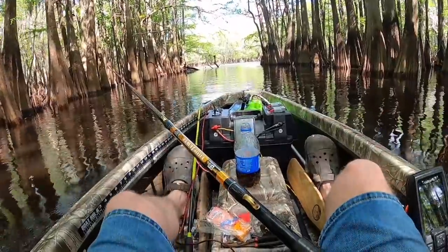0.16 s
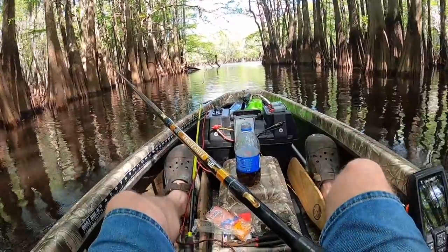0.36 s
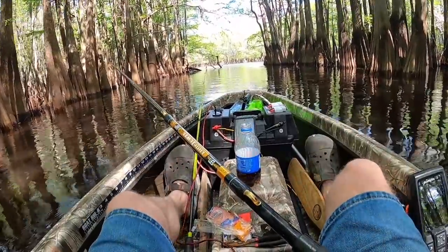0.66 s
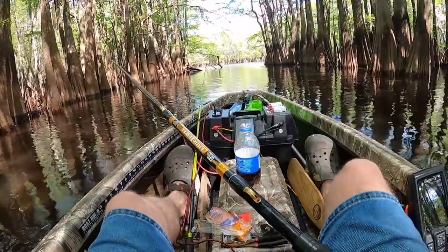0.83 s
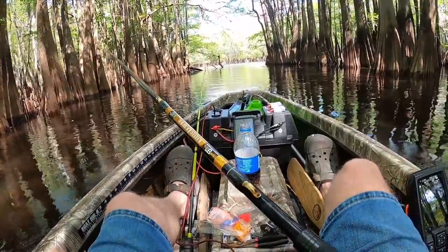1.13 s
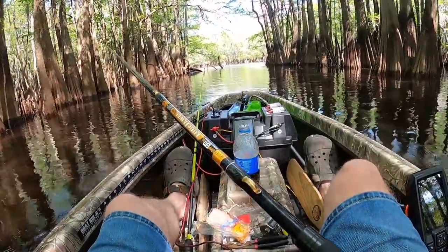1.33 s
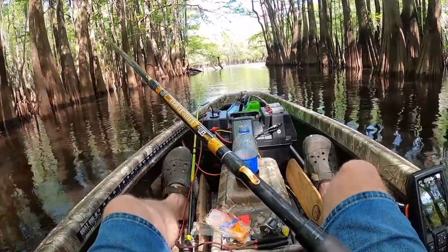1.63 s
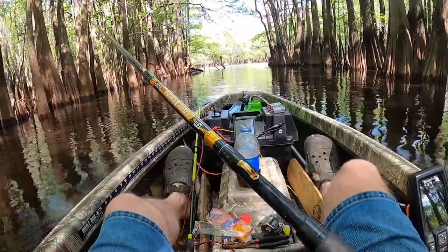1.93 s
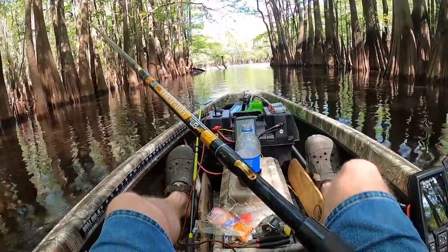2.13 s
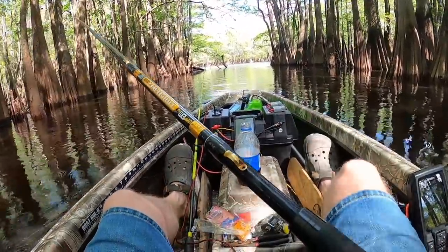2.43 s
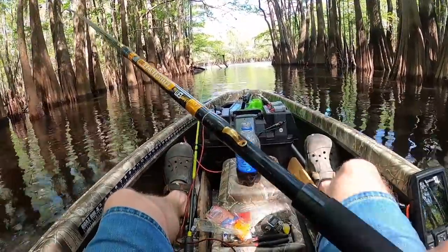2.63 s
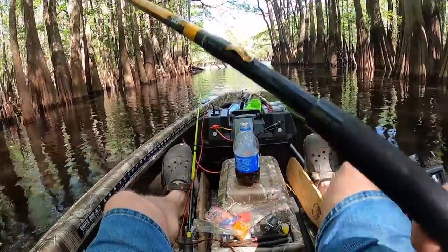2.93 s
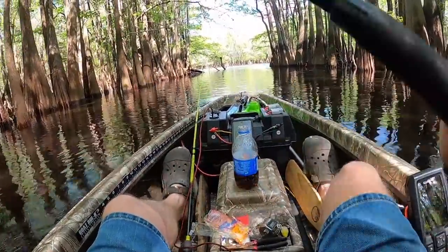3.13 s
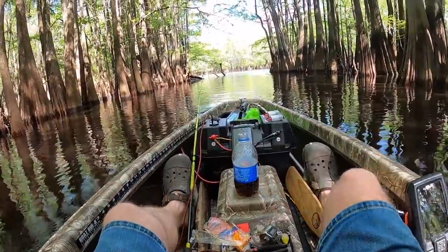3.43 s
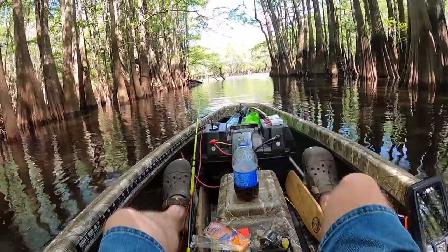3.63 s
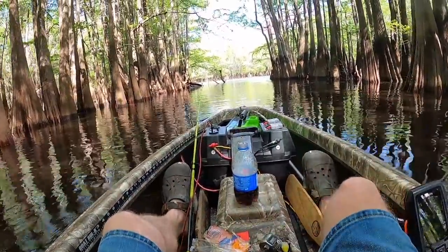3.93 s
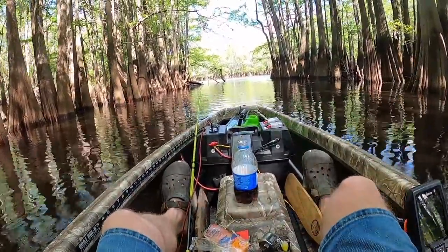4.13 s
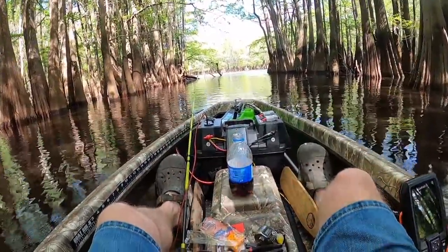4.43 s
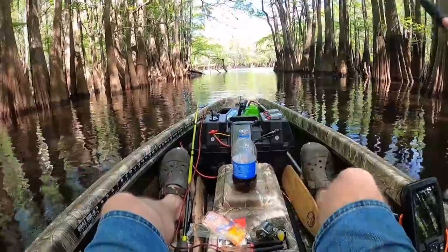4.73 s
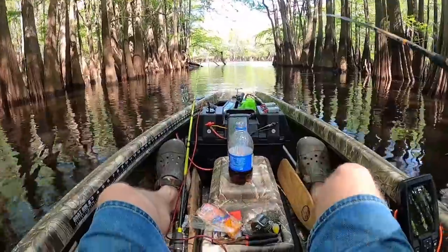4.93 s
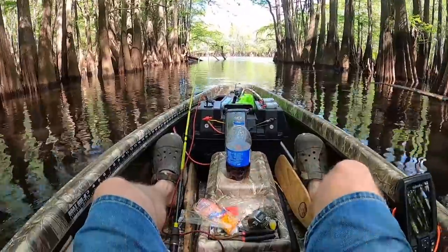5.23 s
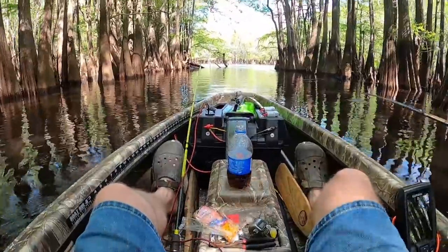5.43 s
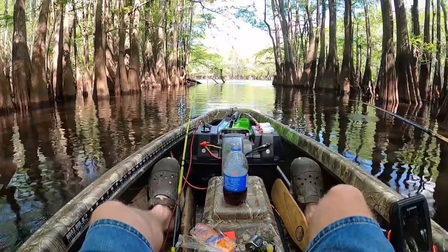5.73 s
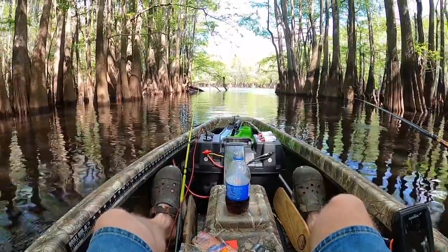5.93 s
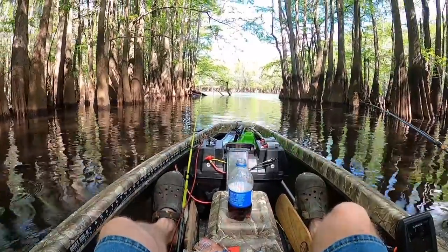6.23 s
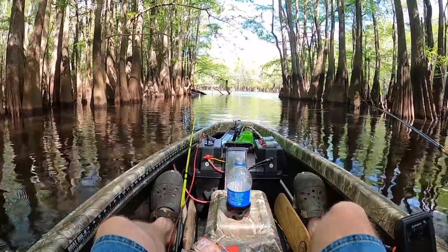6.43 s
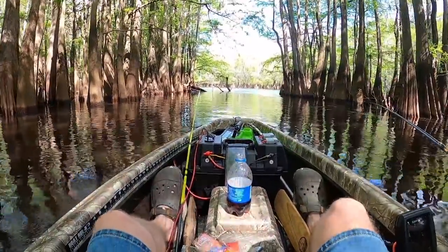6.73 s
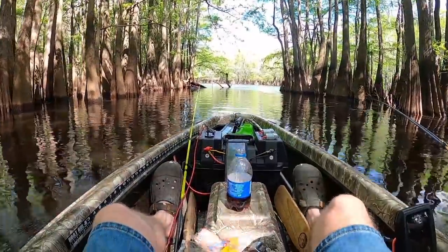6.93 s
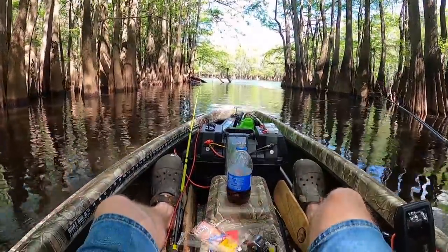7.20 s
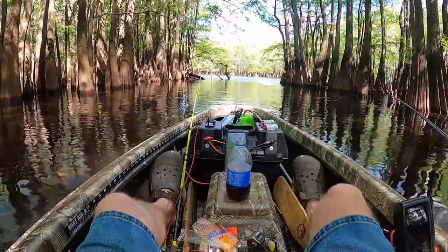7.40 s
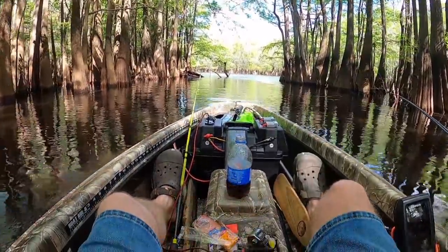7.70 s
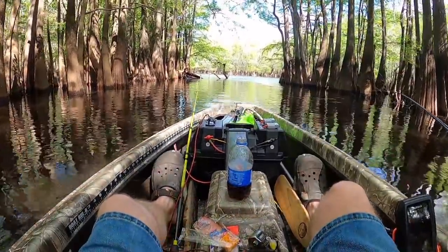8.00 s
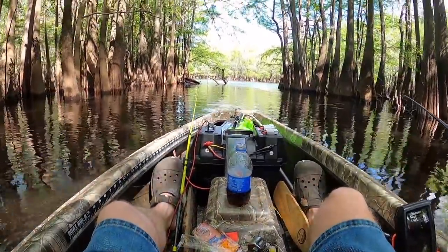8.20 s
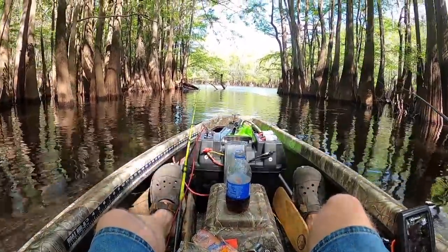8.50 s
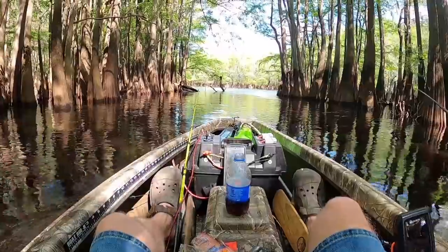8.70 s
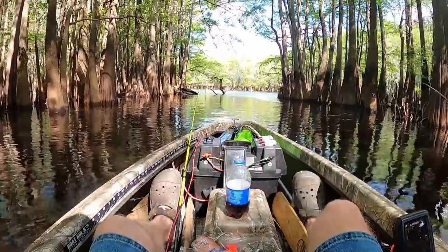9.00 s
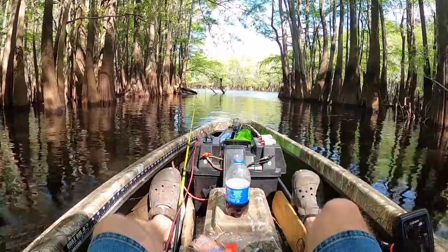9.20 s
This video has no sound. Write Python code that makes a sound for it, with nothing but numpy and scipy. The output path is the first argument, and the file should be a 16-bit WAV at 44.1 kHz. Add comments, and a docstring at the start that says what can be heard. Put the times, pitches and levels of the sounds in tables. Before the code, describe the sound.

A small boat glides through a flooded forest, its electric motor humming low as the hull rumbles and water washes softly beneath. Close to the microphone, a fishing rod rustles, squeaks and knocks on the boat, with a louder clatter late on. A near bird chips in twos and threes throughout. Farther off come whistles, a see-saw song midway and then a rising trill, echoing over faint insects.

```python
"""A flooded forest: a small boat glides along, its electric motor humming through the hull.
The boat rocks and water washes and plops under it, over still air and faint insects.
A fishing rod is handled: it rustles, squeaks and knocks on the boat, making the hull ring.
A near bird gives sharp chips in twos and threes. Further off come whistles, thin high calls,
a see-saw song and a rising trill, all gliding tones that echo among the trunks."""
import sys
import numpy as np
from scipy import signal
from scipy.fft import rfft, irfft, next_fast_len
from scipy.io import wavfile
from scipy.ndimage import uniform_filter1d

SR = 44100
rng = np.random.default_rng(int(sys.argv[2]) if len(sys.argv) > 2 else 0)


def to_wav(s):
    """Save 16-bit WAV."""
    ch = np.atleast_2d(s).T  # columns
    pcm = np.round(np.clip(ch, -1, 1) * 32767)  # PCM
    wavfile.write(sys.argv[1], SR, pcm.astype(np.int16))


N = 412335
T = np.arange(N) / SR

# Levels in all tables are relative: each sound gets its final loudness when it is mixed.
# flow of water along the hull: time_s, level_db
FLOW = [(0.0, -54), (0.88, -56), (2.54, -46.5), (4.25, -47), (4.53, -50), (4.97, -45.5), (5.41, -48),
        (5.85, -47), (6.22, -46.5), (6.52, -52), (7.15, -49.5), (7.43, -55), (7.87, -53), (8.6, -53),
        (8.81, -48), (9.3, -43.5)]


def undb(db):
    """Turn decibels into a number to multiply by."""
    return 10 ** (np.asarray(db) / 20)


def unit(x):
    """Scale a sound to an average strength (rms) of 1."""
    return x / np.sqrt(np.mean(x ** 2) + 1e-20)


def curves(table, t=T):
    """Join the values in each column by straight lines in time."""
    times, *columns = np.transpose(table)
    return [np.interp(t, times, column) for column in columns]


def add(track, start_s, x):
    """Mix a sound into a track."""
    i = max(int(start_s * SR), 0)
    track[i:i + len(x)] += x[:max(N - i, 0)]


def colour(x, spectrum):
    """Shape a sound by (pitch_hz, level_db) points, silent outside them; strength 1."""
    hz, db = np.transpose(spectrum)
    size = next_fast_len(N)
    f = np.maximum(np.fft.rfftfreq(size, 1 / SR), 1)
    gain = undb(np.interp(np.log(f), np.log(hz), db, left=-np.inf, right=-np.inf))
    return unit(irfft(rfft(x, size) * gain, size)[..., :N])


def soften(x, hz):
    """Dull a sound above a given pitch."""
    return signal.sosfilt(signal.butter(2, hz, fs=SR, output="sos"), x)


def drift(rate):
    """Smooth random wandering of size about 1, with rate new values a second."""
    points = rng.standard_normal(2000)
    path = np.interp(T * rate, np.arange(len(points)), points)
    return unit(uniform_filter1d(path, int(SR / rate / 2) + 1))


def swell(t, length, attack, release):
    """A loudness shape that rises, holds and falls back to silence."""
    return np.sin(np.pi / 2 * np.clip(np.minimum(t / attack, (length - t) / release), 0, 1))


def phase_of(hz):
    """The angle a wave has turned through as it follows a pitch curve."""
    return 2 * np.pi * np.cumsum(hz) / SR


def slurs(notes, waver):
    """Pure notes that bend through three pitches and waver in pitch and strength."""
    out = np.zeros(N)
    bend, flutter = 1 + waver * drift(90), undb(2 * drift(60))
    for s, length, start, middle, end, db in notes:
        progress = np.linspace(0, 1, int(length * SR))
        i = max(int(s * SR), 0)
        arch = np.polyfit([0, .5, 1], [start, middle, end], 2)
        hz = np.polyval(arch, progress) * bend[i:i + len(progress)]
        add(out, s, undb(db) * signal.windows.tukey(len(hz), .55) * np.sin(phase_of(hz)))
    return out * flutter


def glides(notes, length_s, rise):
    """List notes of one length that all glide by the same share of their pitch."""
    return [(s, length_s, hz * (1 - rise), hz, hz * (1 + rise), db) for s, hz, db in notes]


def pan(x, left_db):
    """Make a sound left_db louder on the left than on the right."""
    return x * undb(np.array([[left_db], [-left_db]]) / 2)


def delay_left(x, lag):
    """Let a sound reach the left microphone lag samples later."""
    left, right = np.broadcast_to(x, (2, N))
    size = next_fast_len(N)
    delay = np.exp(-2j * np.pi * np.fft.rfftfreq(size) * lag)
    return np.array([irfft(rfft(left, size) * delay, size)[:N], right])


def wide_noise(side_db, size=N):
    """Stereo noise; a higher side_db makes it wider."""
    mid, side = rng.standard_normal((2, size))
    return mid + undb(side_db) * side * np.array([[1], [-1]])


def forest(x, fade_s, build_s, side_db):
    """The echo of countless trunks builds up, then dies away by 60 dB every fade_s."""
    t = T[:SR]
    tail = wide_noise(side_db, size=SR) * (1 - np.exp(-t / build_s)) * undb(-60 * t / fade_s)
    return signal.fftconvolve(x[None], unit(tail) / np.sqrt(SR), axes=1)[:, :N]


def scatter(x):
    """Leaves and twigs on the way smear each note by a few milliseconds."""
    return forest(x, fade_s=.04, build_s=.001, side_db=-5)


def air_and_insects():
    """Still forest air is a soft, low noise; the insect chorus is a faint, high one."""
    # tone of the air: pitch_hz, level_db
    air_tone = [(150, 6), (400, 10), (700, -4), (1200, -4), (2000, -28), (2600, -22), (3500, -32),
                (6000, -41), (8500, -36), (11000, -55), (15500, -32)]
    # tone of the insects: pitch_hz, level_db
    insect_tone = [(3000, -36), (4600, 16), (5300, 2), (6400, 6), (7700, -35), (10000, -19)]
    air = colour(wide_noise(side_db=-8), air_tone) * undb(-63 + .09 * drift(.48))
    insects = colour(wide_noise(side_db=1.5), insect_tone) * undb(-85.5 + .73 * drift(34))
    return air + insects


def motor():
    """The motor shakes the hull at multiples of its shaft's turning speed."""
    # shaft speed: time_s, turns_per_s
    shaft = [(0, 18.3), (1.2, 18.2), (2.2, 17.9), (3.2, 18.3), (5.9, 18.2), (7.2, 18.0), (8.3, 18.2),
             (9.35, 19.0)]
    # low hums at 3 and 4 times the shaft speed: time_s, third_db, fourth_db
    hum = [(0.33, -51.5, -44.5), (1.72, -54, -56), (3.41, -42, -44), (3.51, -49.5, -43.5),
           (5.25, -53.5, -49.5), (5.32, -39, -51), (5.5, -56.5, -46.5), (5.94, -38.5, -48),
           (6.59, -67, -68), (6.81, -47, -51), (6.91, -57, -75), (6.96, -50, -49), (7.28, -58, -65),
           (7.56, -50, -59), (7.66, -46.5, -49), (8.7, -56.5, -52.5), (9.25, -44, -43)]
    # propeller tones, which grow with the flow: shaft_multiple, level_db
    propeller = [(6, -3), (8, -8), (11, -17), (13, -11.5)]
    angle = phase_of(curves(shaft)[0] * (1 + .0084 * drift(7.6)))
    third_db, fourth_db = curves(hum)
    flow_db = curves(FLOW)[0]
    skew = .39 * drift(9) * np.array([[1], [-1]])  # swaying puts left and right out of step

    def shake(multiple, db):
        """One tone of the motor, wavering in strength."""
        return undb(db + 2.23 * drift(7)) * np.sin(multiple * angle + skew + rng.uniform(0, 2 * np.pi))

    low = shake(3, third_db + 4) + shake(4, fourth_db + 5)
    high = sum(shake(multiple, flow_db + db) for multiple, db in propeller)
    return pan(low + high, left_db=.5)


def rocking_boat():
    """With each sway the hull rumbles and air buffets the microphones."""
    # sways of the boat: peak_s, length_s, level_db
    sways = [(0, 0.62, -57), (0.213, 0.59, -39.5), (0.646, 0.52, -48.5), (1.115, 0.79, -49.5),
             (2.89, 0.92, -45), (3.363, 0.3, -45.5), (5.266, 0.49, -47.5), (5.99, 0.22, -40.5),
             (6.355, 0.64, -50), (6.9, 0.48, -51), (7.487, 0.73, -52), (7.774, 0.39, -38.5),
             (8.307, 0.23, -57), (8.87, 0.24, -69)]
    # tone of the hull's rumble: pitch_hz, level_db
    rumble_tone = [(8, -24), (30, 8), (50, 9.5), (70, -2), (110, -8), (220, -31)]
    # tone of the buffeting air: pitch_hz, level_db
    buffet_tone = [(10, -17), (24, 1), (36, -15), (60, -18.5)]
    rocking = undb(-59.5)  # a little remains between sways
    for s, length, db in sways:
        half = length / 2
        rocking = rocking + undb(db) * swell(T - s + half, length, half, half) ** 2
    rumble = colour(wide_noise(side_db=-7.5), rumble_tone) * rocking * undb(3.5)
    buffet = colour(wide_noise(side_db=6), buffet_tone) * rocking * undb(-10.5)
    return pan(rumble, left_db=4) + buffet


def water():
    """Water washes along the hull as low noise and plops under it in short rising notes."""
    # tone of the wash: pitch_hz, level_db
    wash_tone = [(30, -39.5), (60, 2.5), (100, 11.5), (150, 2.5), (200, 0.5), (240, -2.5), (290, -9),
                 (450, -20.5), (700, -29.5), (1500, -87)]
    # plops under the hull: start_s, pitch_hz, level_db
    plop_notes = [(.725, 320, -62), (1.16, 318, -51), (1.225, 299, -48.5), (1.335, 290, -55),
                  (1.402, 358, -57), (1.825, 322, -55.5)]
    wash = colour(wide_noise(side_db=-24.5), wash_tone) * undb(curves(FLOW)[0] + 1 + 1.88 * drift(16))
    plops = slurs(glides(plop_notes, length_s=.038, rise=.088), waver=.035)
    return pan(wash + plops, left_db=1.5)


def friction(rough_db, catch_db, side_db):
    """Noise of uneven strokes, with tiny ticks where the surfaces catch."""
    caught = rng.random(N) < 400 / SR  # about 400 ticks a second
    ticks = caught * rng.standard_normal(N) * undb(2 * rng.exponential(size=N))
    return (wide_noise(side_db) + undb(catch_db) * unit(ticks)) * undb(rough_db * drift(45))


def rod_handling():
    """Hands rub the rod, it slides and swishes over cloth, the line hisses and the gear squeaks."""
    # moves of the hands and rod: start_s, length_s, rub_db, swish_db, hiss_db
    moves = [(-.05, 0.42, -66, -74, -82), (0.78, 0.52, -66, -82, -94), (1.147, 0.36, -63, -79, -91),
             (1.442, 0.35, -64, -74.5, -81), (1.677, 0.44, -66.5, -79, -93),
             (2.26, 0.37, -65.5, -70.5, -82.5), (2.576, 0.53, -64, -70, -83.5), (3.375, 0.3, -67, -85, -93),
             (4.275, 0.21, -69, -74, -98), (4.658, 0.33, -70, -70.5, -83), (4.904, 0.45, -77, -75, -80.5),
             (5.437, 0.43, -64, -79.5, -90), (5.745, 0.28, -61.5, -85, -81), (5.962, 0.61, -62, -93, -87),
             (6.63, 0.62, -59, -77, -81.5), (8.417, 0.46, -60.5, -85, -89),
             (8.936, 0.25, -66.5, -76, -83.5), (9.194, 0.39, -70, -75, -78)]
    # tones of the rubbing hands, rod tube, cloth and line: pitch_hz, level_db
    rub_tone = [(300, 13), (600, 5), (1000, 2.5), (1280, 7), (1500, 4.5), (1750, 3), (2200, 0.5),
                (2800, -8.5), (4300, -17), (6500, -39), (10000, -43)]
    tube_tone = [(900, -30), (1270, 10.5), (1500, -6), (1750, 4.5), (2150, 4.5), (2800, -16), (3500, -6),
                 (4100, -4), (4700, -3), (6000, -28)]
    swish_tone = [(1700, -25.5), (2400, 6), (2900, 1.5), (3500, -0.5), (4500, -1), (7000, -8.5)]
    hiss_tone = [(2000, -28.5), (4500, 2), (6500, 6.5), (9000, 8), (11000, -5), (13000, -2), (15500, -29)]
    # squeaks of shifting gear: start_s, length_s, start_hz, middle_hz, end_hz, level_db
    squeaks = [(0, 0.041, 423, 401, 380, -50), (.168, 0.019, 1100, 1160, 1190, -54),
               (.172, 0.065, 1450, 1500, 1650, -62), (.21, 0.016, 1660, 1810, 1920, -50),
               (.23, 0.032, 1280, 1480, 1780, -55.5), (.248, 0.019, 1860, 2076, 2020, -48.5),
               (.36, 0.027, 1830, 1790, 1800, -63), (1.6, .045, 3900, 3750, 3570, -64),
               (1.722, 0.083, 4200, 4080, 3960, -61), (1.83, .07, 4500, 4320, 4180, -76),
               (7.078, 0.033, 1130, 1170, 1240, -59), (8.46, 0.064, 1327, 1350, 1170, -59)]
    moving = sum(np.outer(undb(levels), swell(T - s, length, attack=.12, release=.18))
                 for s, length, *levels in moves)
    holding = undb([[-71.5], [-81], [-89]])  # rub, swish and hiss while the rod is just held
    rubbing, swishing, hissing = np.hypot(moving, holding) * undb(drift(30))
    # the rod slides once and its tube rings
    sliding = undb(-59.5) * swell(T - 1.593, length=.39, attack=.23, release=.088)
    grip = friction(rough_db=2.6, catch_db=-8, side_db=-5)
    cloth = friction(rough_db=1.7, catch_db=-12, side_db=-10)
    rub = colour(grip, rub_tone) * rubbing + colour(grip, tube_tone) * sliding
    swish = colour(cloth, swish_tone) * swishing * undb(3.5)
    hiss = colour(cloth, hiss_tone) * hissing * undb(5.5)
    squeak = slurs(squeaks, waver=.0296)
    squeak = squeak + undb(-4.5) * forest(squeak, fade_s=.11, build_s=.0056, side_db=-22)
    rustle = delay_left(rub + swish + undb(-1.5) * squeak, lag=1.2)
    return pan(rustle, left_db=4.5) + pan(hiss, left_db=-.1)


def ring(tones, push, detune):
    """A push rings an object's own fading tones; each blow lands on another spot. Peak 1."""
    t = T[:len(push)]
    body = np.zeros(len(t))
    for hz, db, fade_s in tones:
        loud, sharp, flip = rng.standard_normal(3)
        wave = np.sin(2 * np.pi * hz * (1 + detune * sharp) * t)
        body += np.sign(flip) * undb(db + .23 * loud - 60 * t / fade_s) * wave
    ringing = signal.fftconvolve(push, body)[:len(t)]
    return ringing / np.abs(ringing).max()


def favour(tones, near_hz, slope_db):
    """The struck spot favours tones near one pitch; others lose slope_db an octave."""
    return [(hz, db - slope_db * abs(np.log2(hz / near_hz)), fade_s) for hz, db, fade_s in tones]


def knocks():
    """Each gritty blow clacks and rings the rod and hull, while its weight thuds in the floor."""
    # rod and gear hitting the boat:
    # start_s, ring_db, ring_hz, crack_db, dull_above_hz, thud_db, thud_hz, contact_s
    blows = [(0.101, -68, 600, -85, 4000, -27, 73, 0.0027),
             (.161, -35, 955, -71, 4000, -28.5, 189, 0.00083),
             (0.237, -47, 1500, -59.5, 5000, -23, 70.4, 0.0018),
             (0.288, -64, 750, -83, 4000, -34, 70, 0.0049), (0.34, -47, 1090, -52, 11900, -43, 151, 0.0036),
             (.584, -60, 1500, -65, 9000, -65, 151, .0012),
             (1.102, -29, 2220, -37, 11900, -52, 191, 0.0019),
             (1.1035, -31.5, 2380, -36, 11500, -47, 94, 0.0016),
             (1.11, -44, 2400, -43, 11000, -43, 150, 0.0046),
             (1.378, -40, 1210, -50, 14200, -40, 293, 0.0059),
             (1.409, -47, 1290, -69, 4000, -57, 295, 0.0036),
             (1.443, -54, 1526, -55, 7000, -62, 190, 0.00057),
             (1.585, -41, 1280, -53, 9000, -47, 150, .0034), (1.644, -61, 2000, -57, 6000, -53, 190, .001),
             (1.921, -43.5, 1140, -65, 5000, -46, 190, 0.014),
             (2.112, -55, 2400, -63, 8000, -66, 190, 0.0013),
             (2.295, -33, 1270, -56, 3800, -40, 94, 0.0016),
             (2.337, -43, 1400, -55, 4500, -54, 150, 0.0081),
             (2.406, -40, 1920, -47, 5500, -41, 94, 0.0014), (2.805, -63, 1500, -80, 5000, -41, 151, .0015),
             (2.923, -38.5, 1410, -69, 5000, -34.5, 151, 0.0076),
             (2.992, -49, 1700, -52, 6000, -29, 70, 0.0032), (3.83, -43, 1120, -57, 7000, -70, 190, 0.0014),
             (4.867, -48, 800, -79, 5000, -60, 190, 0.014), (5.151, -39, 1120, -56, 6000, -58, 190, 0.0059),
             (5.198, -55, 1230, -50, 9000, -55, 149, 0.00089),
             (5.376, -71, 1500, -60, 11000, -62, 190, 0.0008),
             (5.601, -44, 860, -74, 5000, -32, 151, 0.0078),
             (5.898, -51, 1300, -47, 9000, -52, 150, 0.0018),
             (6.337, -47.5, 1820, -61, 6000, -53, 190, 0.024),
             (6.842, -65, 1800, -53, 8000, -59, 190, 0.0015), (7, -40.5, 1750, -74, 3000, -65, 190, 0.0014),
             (7.041, -31, 1810, -43, 3000, -50, 290, 0.0028),
             (7.046, -30, 1520, -38.5, 6400, -34.5, 357, 0.0063),
             (7.055, -42, 604, -45.5, 5000, -40, 277, .004),
             (7.066, -33.5, 540, -49, 4000, -41, 284, 0.0062),
             (7.071, -35, 487, -53, 4000, -29, 227, 0.0026),
             (7.095, -49, 500, -77, 3000, -32.5, 188, .0046),
             (7.118, -55, 550, -76, 3000, -35, 188, 0.0028),
             (8.502, -42.5, 1240, -88, 4000, -57, 190, 0.0013),
             (8.722, -32.5, 970, -72, 3000, -41.5, 187, 0.0024),
             (8.821, -76, 500, -85, 4000, -28.5, 152, 0.0016),
             (9.218, -49, 1110, -52, 7040, -41, 149, 0.0032)]
    # ringing tones of the hull, the floor and the hard rod and reel: pitch_hz, level_db, fade_s
    hull_tones = [(455, -7, 0.16), (522, 9, 0.012), (720, -1, 0.031), (830, -7.5, 0.025), (986, 3, 0.027),
                  (1080, -0.5, 0.025), (1244, -1, 0.026), (1500, -26, 0.008), (1687, 7.5, 0.012),
                  (1980, -2, 0.028), (2410, 4.5, 0.017), (2520, -16.5, 0.056), (2910, 8.5, 0.005)]
    floor_tones = [(71.5, 6, 0.044), (97, 6, 0.082), (145.5, -3.5, 0.17), (185.7, -0.5, 0.095),
                   (235.5, -8, 0.083), (286, -8, 0.11), (353, -2.5, 0.085)]
    rod_tones = [(1580, -3, .025), (2150, 1, .015), (3020, 0, .018), (3280, -2, .012), (4450, -1, .016),
                 (5100, -6, .01), (6340, 2, .018), (7000, -6, .012), (7830, -2, .016), (8890, -9, .012),
                 (10600, -12, .01), (12500, -19, .01)]
    body, cracks, t = np.zeros(N), np.zeros(N), T[:SR // 4]
    for s, ring_db, ring_hz, crack_db, dull_above_hz, thud_db, thud_hz, contact_s in blows:
        force = np.exp(-t / contact_s) * (1 - np.exp(-t / .001))
        grit = rng.standard_normal(len(t)) * force
        edge = soften(grit, dull_above_hz)
        clack = np.diff(soften(edge, hz=4670), prepend=0)
        shove = np.diff(soften(force, hz=269), prepend=0)  # the heavy floor follows only slow pushes
        thud = ring(favour(floor_tones, thud_hz, slope_db=12), shove, detune=.026)
        hull = ring(favour(hull_tones, ring_hz, slope_db=8.5), soften(grit, hz=3800), detune=.039)
        rod = ring(rod_tones, edge, detune=.02)
        add(body, s, undb(ring_db) * hull + undb(thud_db - 1) * thud)
        add(cracks, s, undb(crack_db) * (undb(2.5) * rod + undb(5.5) * clack / np.abs(clack).max()))
    dulled = soften(body + undb(1.5) * cracks, hz=4700)
    echo = undb(-9) * forest(dulled, fade_s=.13, build_s=.0022, side_db=-7)
    direct = pan(delay_left(body, lag=4.1), left_db=2) + pan(delay_left(cracks, lag=.35), left_db=3.5)
    return direct + echo


def near_bird():
    """Each chip snaps down in pitch, then sags while its overtones grow."""
    # chips: start_s, level_db
    chips = [(0.345, -41.5), (.391, -39.5), (1.492, -41.5), (1.537, -40), (1.589, -40), (2.93, -42),
             (2.976, -39.5), (3.788, -39), (3.837, -38), (4.805, -38.5), (4.849, -37.5), (5.816, -39.5),
             (5.862, -42), (6.744, -40), (6.792, -40.5), (7.736, -42), (7.782, -41.5), (7.835, -42.5),
             (8.977, -40.5), (9.025, -40)]
    # echoes off the water and close trunks: delay_s, level_db
    echoes = [(.0041, -4.5), (0.01, -8.5)]
    length_s, top_hz, main_hz, snap_s, sag_hz_per_s = .022, 6500, 5320, .0016, 28000
    out, t = np.zeros(N), T[:int(length_s * SR)]
    shape = swell(t, length_s, attack=.0044, release=.0055)
    growth = undb(9.6 * (t / length_s - 1))
    for s, db in chips:
        sharp, steep = rng.standard_normal(2)
        hz = main_hz + (top_hz - main_hz) * np.exp(-t / snap_s) - sag_hz_per_s * (1 + .06 * steep) * t
        phase = phase_of(hz * (1 + .0053 * sharp))
        overtones = undb(-20.5) * np.sin(2 * phase) + undb(-31) * np.sin(3 * phase)
        chip = undb(db - 4) * shape * (np.sin(phase) + growth * overtones)
        add(out, s, chip)
        for delay_s, echo_db in echoes:
            add(out, s + delay_s * (1 + .077 * rng.standard_normal()), undb(echo_db) * chip)
    echo = undb(-11) * forest(out, fade_s=.13, build_s=.00089, side_db=2)
    return pan(delay_left(out, lag=1.3), left_db=-2) + echo


def whistling_bird():
    """Whistles creep up in pitch, then droop and lose their strength."""
    # whistles: start_s, length_s, pitch_hz, level_db
    notes = [(0.416, 0.056, 2775, -55.5), (0.631, .13, 2765, -56.5), (0.896, 0.11, 2757, -56),
             (4.063, 0.05, 2710, -62), (4.275, .125, 2765, -61.5), (4.507, 0.14, 2747, -58),
             (7.933, 0.089, 2730, -64.5), (8.14, 0.12, 2780, -57.5), (8.403, .12, 2764, -55)]
    rise_hz_per_s, droop_hz, droop_s, fade_db = 680, 400, .014, 6
    out, bend = np.zeros(N), 1 + .014 * drift(80)
    for s, length, start_hz, db in notes:
        t = T[:int(length * SR)]
        droop = np.exp((t - length) / droop_s)
        hz = (start_hz + rise_hz_per_s * t - droop_hz * droop) * np.interp(s + t, T, bend)
        shape = swell(t, length, attack=.025, release=.006) * undb(db + 1 - fade_db * droop)
        add(out, s, shape * np.sin(phase_of(hz)))
    return out * undb(2 * drift(50))


def thin_calls():
    """A bird gives short, high notes that fall slightly."""
    # calls: start_s, pitch_hz, level_db
    calls = [(.91, 7700, -73), (1.08, 6700, -65), (1.3, 6930, -66), (3.94, 7570, -68), (7.67, 7440, -66.5),
             (8.3, 7220, -68)]
    return slurs(glides(calls, length_s=.031, rise=-.026), waver=.0043)


def seesaw_bird():
    """One falling and rising phrase repeats, ending in a high flick that differs each time."""
    # repeats of the phrase: start_s, level_db, flick_after_s, flick_db
    repeats = [(4.28, -61, 0.12, -66), (4.529, -55.5, 0.12, -61), (4.77, -53, 0.14, -67),
               (4.997, -57.5, 0.14, -62.5), (5.236, -57.5, 0.13, -56.5), (5.474, -57.5, 0.14, -65.5)]
    # a held start, a steep fall, a rise: after_s, length_s, start_hz, middle_hz, end_hz, accent_db
    phrase = [(0, .036, 6250, 5980, 5600, -7), (.022, .055, 5850, 5000, 3650, -.5),
              (.086, .052, 3800, 4600, 5500, -4)]
    notes = []
    for s, db, flick_after_s, flick_db in repeats:
        notes += [(s + after, length, *pitches, db + accent) for after, length, *pitches, accent in phrase]
        reach = 1 + .018 * rng.standard_normal()
        notes.append((s + flick_after_s, .04, 6850, 7550 * reach, 8200 * reach ** 2, flick_db))
    return slurs(notes, waver=.0171)


def trilling_bird():
    """A climbing run of tiny downward flicks, no two quite alike, ends in a flourish."""
    # course of the trill: time_s, pitch_hz, level_db
    course = [(6.039, 5400, -75), (6.25, 5380, -64), (6.43, 5390, -56.5), (6.6, 5780, -55.5),
              (6.72, 6030, -57.5), (6.91, 5510, -53)]
    # arched closing notes: start_s, length_s, start_hz, middle_hz, end_hz, level_db
    flourish = [(6.93, 0.024, 3700, 4850, 5170, -50.5), (6.973, 0.042, 4950, 4860, 3840, -44.5),
                (6.997, 0.0283, 4210, 5040, 4480, -45.5), (7.022, 0.015, 4670, 5100, 6100, -47.5)]
    note_s, step_s = .016, .0349
    fall = np.array([1.08, 1, .78])  # start, middle and end as shares of the pitch
    times = np.arange(course[0][0], course[-1][0] + step_s / 2, step_s)
    notes = []
    for s, hz, db in zip(times, *curves(course, times)):
        late, sharp, loud, steep = rng.standard_normal(4)
        pitches = hz * (1 + .012 * sharp) * fall ** (1 + .2 * steep)
        notes.append((s - .005 + .0018 * late, note_s, *pitches, db + loud))
    return slurs(notes, waver=.019) + slurs(flourish, waver=.0172)


def far_birds():
    """Distant songs arrive with quick echoes off nearby trunks and the long echo of the deep forest."""
    whistle, seesaw, calls, trill = whistling_bird(), seesaw_bird(), thin_calls(), trilling_bird()
    deep = undb(-16.5) * forest(seesaw + calls + trill, fade_s=1.7, build_s=.034, side_db=-4)
    bank_echo = np.zeros(N)
    add(bank_echo, start_s=.085, x=undb(-11) * scatter(whistle)[0])
    whistle = (undb(-4) * whistle + bank_echo
               + undb(-10) * forest(whistle, fade_s=.14, build_s=.002, side_db=-5)
               + undb(-8) * forest(whistle, fade_s=1.7, build_s=.04, side_db=-5))
    seesaw = (undb(-6.5) * seesaw + undb(-7.5) * scatter(seesaw)
              + undb(.5) * forest(seesaw, fade_s=.57, build_s=.0063, side_db=-4))
    calls = undb(-6) * calls + undb(-4.5) * forest(calls, fade_s=.61, build_s=.004, side_db=-20)
    trill = undb(-2) * (trill + scatter(trill)) + forest(trill, fade_s=.4, build_s=.006, side_db=-1.5)
    return pan(whistle, left_db=3.5) + seesaw + calls + trill + deep


def scene():
    """Birds, boat, rod and forest air together."""
    birds = near_bird() + far_birds()
    boat = knocks() + motor() + rocking_boat() + water() + rod_handling()
    return birds + boat + air_and_insects()


def record(dry):
    """The right microphone is brighter in the high treble; the very highest treble is cut off."""
    size, top_hz = next_fast_len(N), 15600
    treble = np.interp(np.fft.rfftfreq(size, 1 / SR), [9000, 12500], [0, 1])
    heard = irfft(rfft(dry, size) * undb(np.outer([-3, 1.5], treble)), size)[:, :N]
    return signal.sosfilt(signal.ellip(8, .2, 70, top_hz, fs=SR, output="sos"), heard)


dry = scene()
out = record(dry)
to_wav(out)
```